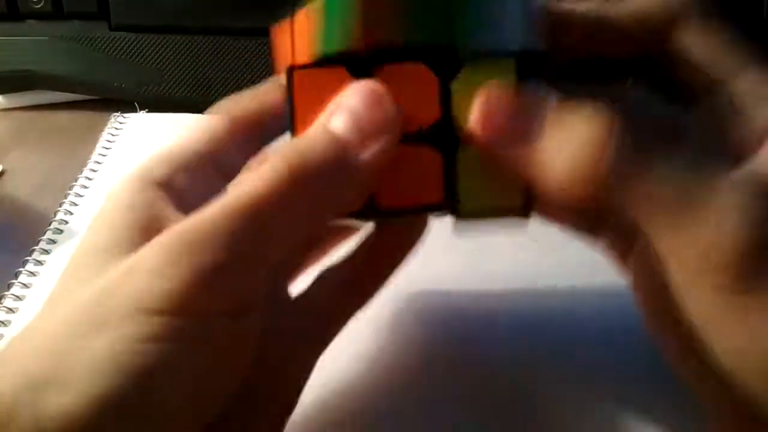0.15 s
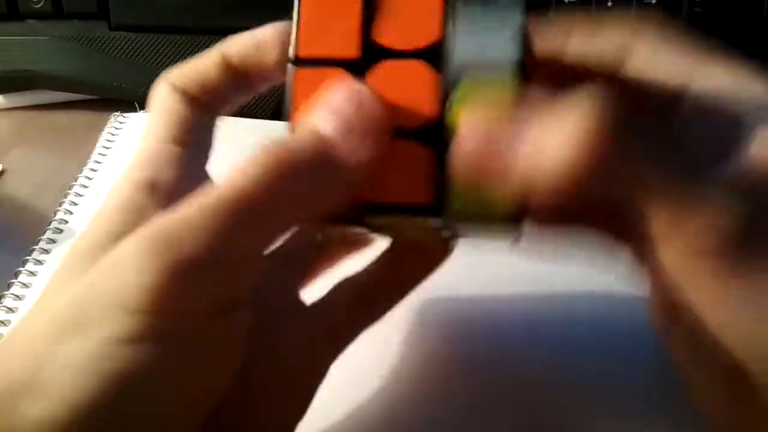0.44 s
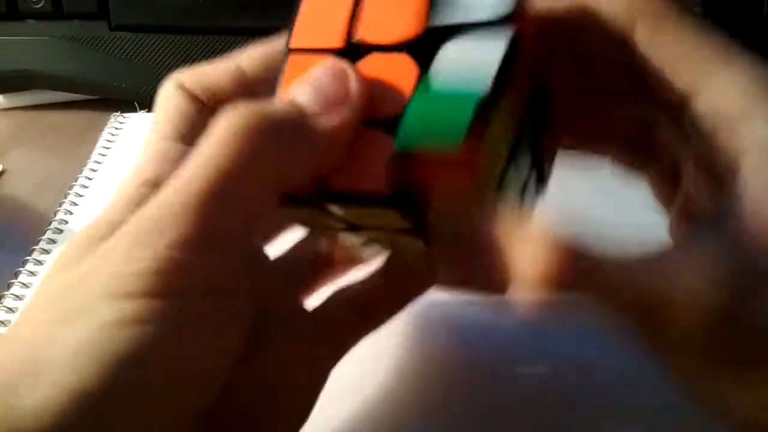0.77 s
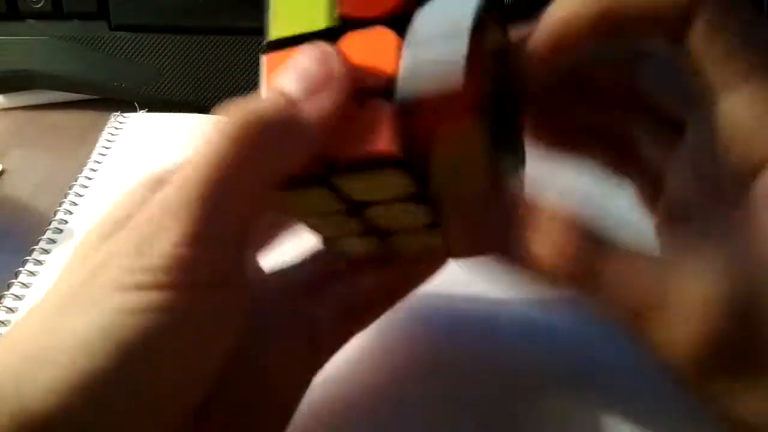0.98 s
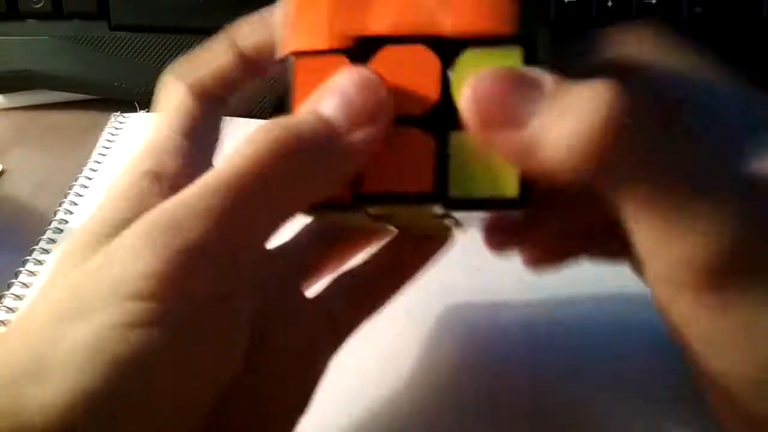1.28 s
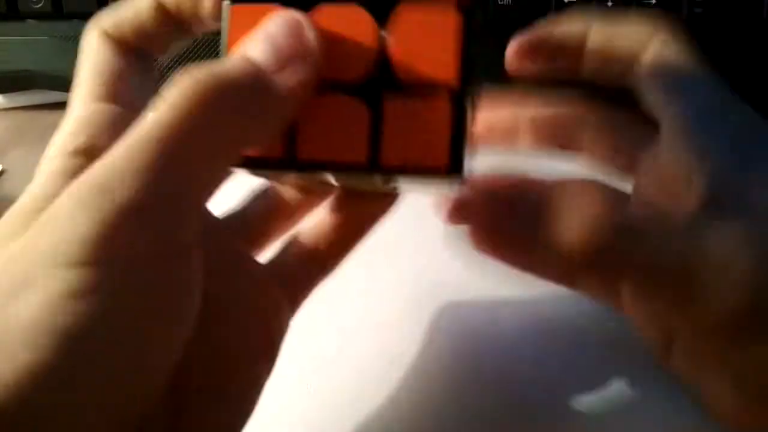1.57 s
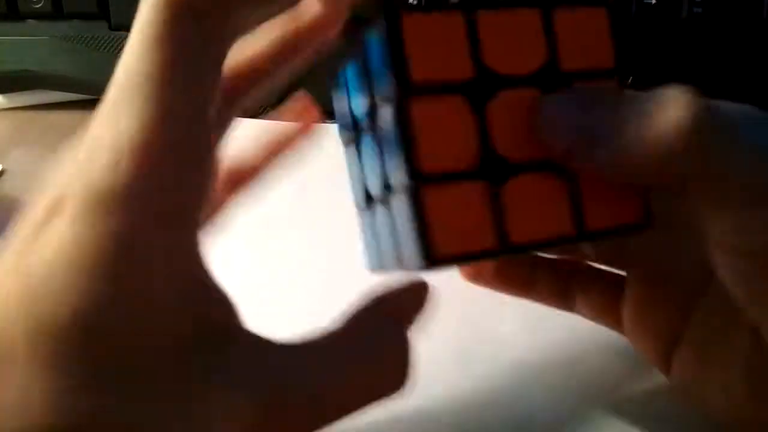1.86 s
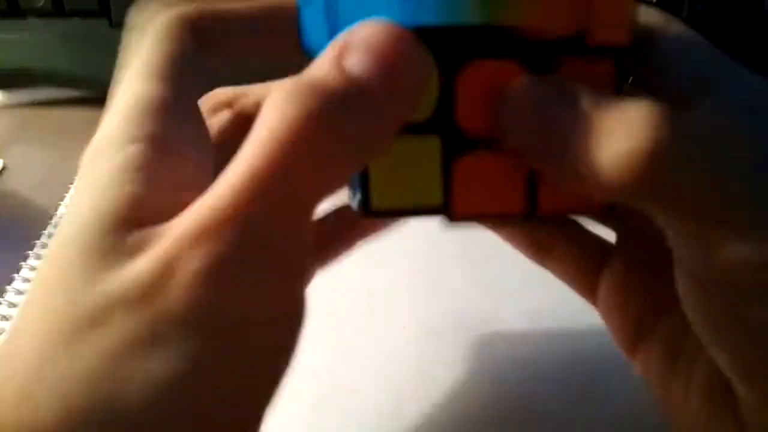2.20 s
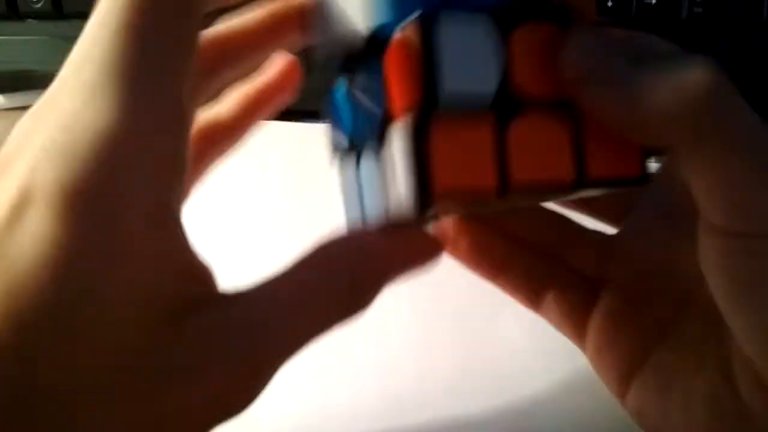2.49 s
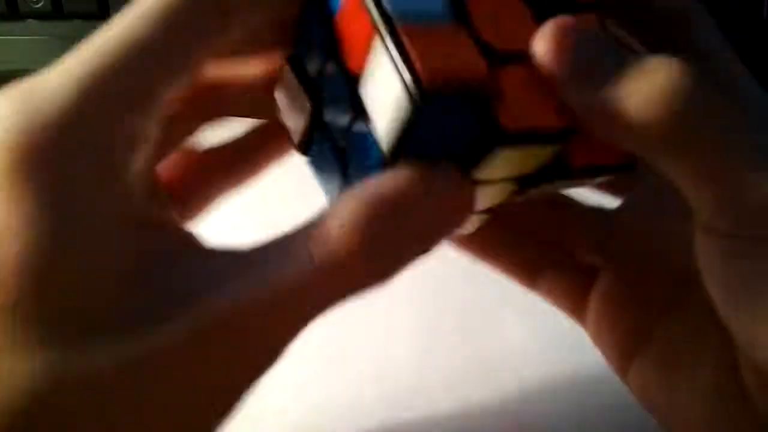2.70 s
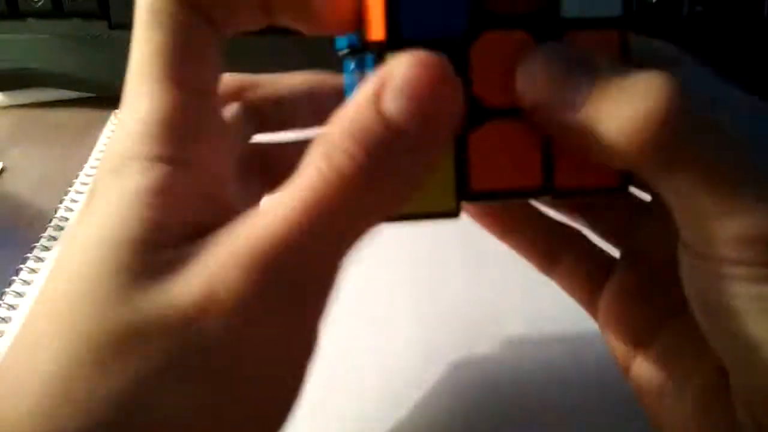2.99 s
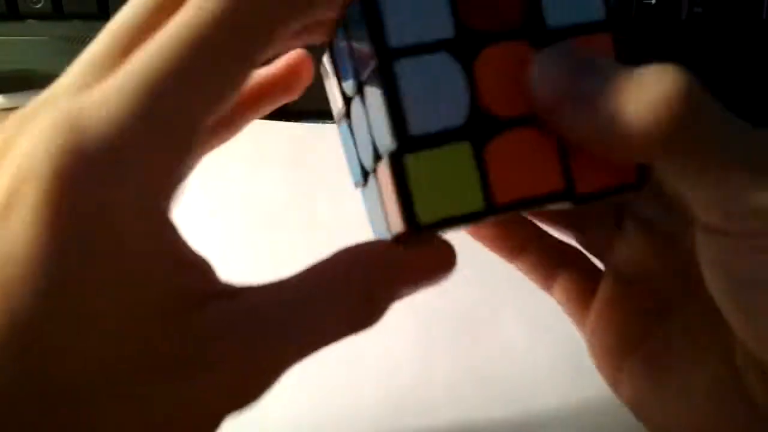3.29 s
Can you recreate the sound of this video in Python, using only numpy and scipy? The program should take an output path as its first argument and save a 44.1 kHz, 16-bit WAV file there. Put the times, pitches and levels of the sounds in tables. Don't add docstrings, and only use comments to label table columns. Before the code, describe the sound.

Rapid plastic clacks and sharp snaps of a puzzle cube, with grainy rubbing layers between turns and soft finger taps later; close stereo microphone, small indoor room, faint hiss beneath, one short lull midway.

```python
import sys
import numpy as np
from scipy import signal
from scipy.fft import rfft, irfft, next_fast_len
from scipy.io import wavfile
from scipy.ndimage import uniform_filter1d, map_coordinates

SR = 44100
rng = np.random.default_rng(int(sys.argv[2]) if len(sys.argv) > 2 else 0)


def transcribe(u):
    v = np.clip(np.atleast_2d(u).T, -1, 1)
    q = np.round(v * 32767).astype(np.int16)
    wavfile.write(sys.argv[1], SR, q)


def decibels_to_gain(level_db):
    exponent = np.asarray(level_db, float) / 20
    return 10 ** exponent


N = 152145
T = np.arange(N) / SR


def unit(x):
    return x / np.sqrt(np.mean(x ** 2) + 1e-20)


def along(points, hz):
    f, v = np.transpose(points)
    return np.interp(np.log(hz + 1), np.log(f + 1), v)


def filtered(x, response):
    m = next_fast_len(N + 8192)
    return irfft(rfft(x, m) * response(np.fft.rfftfreq(m, 1 / SR)), m)[..., :N]


def coloured(x, gain):
    power = np.mean(abs(gain(np.linspace(0, SR / 2, num=999))) ** 2)
    return filtered(x, gain) / np.sqrt(power)


def wobble(rate, size):
    knots = rng.standard_normal(int(size * rate / SR) + 4)
    return map_coordinates(knots, [np.arange(size) * rate / SR])


def pair(size):
    shared = 0.29
    a = rng.standard_normal((3, size))
    return np.sqrt(shared) * a[0] + np.sqrt(1 - shared) * a[1:]


# (f/Hz, level/dB)
EDGE_TONE = [(300, -75), (1900, -14.5), (3200, -13.5), (3900, -13.5), (5800, -5.5), (9600, -3), (13000, -8),
             (16000, -10)]


def edge(x):
    return coloured(x, lambda hz: decibels_to_gain(along(EDGE_TONE, hz)))


# (f/Hz, width/Hz, level/dB)
SHELL_MODES = [(453, 180, -1.5), (781, 113, 3), (1082, 306, 1), (2030, 60, -14), (2317, 650, -1.5)]


def body(x):
    def gain(f):
        low_cut = 1j * f / (SHELL_MODES[0][0] + 1j * f)
        ring = 0
        for k, (centre, width, db) in enumerate(SHELL_MODES):
            ring = ring + (-1) ** k * decibels_to_gain(db) * 1j * f * width / (centre * centre - f * f + 1j * f * width)
        return low_cut * ring
    return coloured(x, gain)


# (t/s, level/dB, length/ms, hollow shell level/dB)
RATTLES = [(0.0069, -21.5, 8.5, -34), (0.0751, -46, 4.4, -34), (0.111, -13, 1.9, -22.5),
           (0.116, -4.5, 7.6, -32), (0.215, -21.5, 3.7, -28.5), (0.2336, -16, 3, -26),
           (0.2438, -5.5, 7.9, -21.5), (0.2671, -16, 6.2, -22.5), (0.301, -12, 2.75, -20),
           (0.3361, -17, 2.5, -32), (0.405, -13, 5.4, -27), (0.4249, -7.5, 5, -23),
           (0.49, -13.5, 1.2, -19.5), (0.4985, -12, 4, -20), (0.518, -10, 9.9, -25.5),
           (0.5394, -10, 4.9, -24), (0.6328, -9, 3.3, -20.5), (0.6506, -7.5, 5.5, -25.5),
           (0.6583, -13, 3.6, -56), (0.685, -17, 8.7, -29.5), (0.709, -8, 4, -42),
           (0.7283, -7.5, 8.4, -31.5),
           (0.7964, -16.5, 3.5, -34), (0.8049, -10, 3.2, -27), (0.8118, -33, 6.8, -29),
                  (0.8306, -5, 4.5, -19.5), (0.8996, -10, 5.1, -20.5), (0.9278, -13, 8.7, -31),
                  (1.0267, -18.5, 3.7, -24), (1.0443, -6.5, 9.8, -27.5), (1.0767, -20, 30, -32),
                  (1.102, -16.5, 2.6, -46), (1.1073, -12, 5, -44), (1.1137, -6.5, 6.1, -52),
                  (1.179, -32, 6.2, -29), (1.1953, -13.5, 8.9, -27.5), (1.2194, -3.5, 4.1, -22),
                  (1.2905, -11, 7, -21.5), (1.3052, -8.5, 1.9, -46), (1.313, -12.5, 8.1, -25),
                  (1.4111, -9, 2.4, -19), (1.4286, -28, 9.8, -21), (1.4357, -7.5, 6.8, -26.5),
                  (1.447, -1.5, 2.5, -41), (1.4673, -8, 5.5, -24.5), (1.4775, -9.5, 3.8, -46),
                  (1.4914, -8.5, 4.2, -44),
           (1.573, -35, 2.2, -40), (1.6196, -9, 3.9, -20.5), (1.637, -4.5, 4.06, -21.5),
                 (1.949, -54, 1.9, -43.5), (2.1846, -20.5, 8.1, -33), (2.2033, -22, 1, -28),
                 (2.2107, -24.5, 1.5, -39.0), (2.232, -31, 1.2, -40), (2.2958, -24, 2.8, -28),
                 (2.3134, -4.5, 5.36, -23.5), (2.3395, -6.5, 5.8, -33), (2.4577, -22, 6.4, -33.5),
                 (2.468, -19.5, 3.7, -29), (2.5149, -18.5, 7.7, -34), (2.5247, -22, 3, -30),
                 (2.5493, -8.0, 5.5, -36), (2.557, -35, 5.2, -25.5), (2.5771, -10, 3.1, -28),
                 (2.585, -10, 7.6, -29),
           (2.6952, -25.5, 1.7, -42), (2.7311, -29, 2, -30.5), (2.76, -49, 4.6, -36),
                (2.7793, -25.5, 9.4, -43), (2.8314, -23.5, 4.3, -39), (2.8536, -8, 7.3, -29),
                (2.8799, -14.5, 8.1, -31.5), (3.0307, -11.5, 2.9, -29), (3.0383, -9.5, 3.5, -23.5),
                (3.0683, -6.5, 7, -20), (3.079, -9, 8.4, -54), (3.157, -22, 11, -30.5),
                (3.1774, -35, 7.5, -54), (3.1948, -9.5, 5.1, -27), (3.2655, -33, 8.7, -52),
                (3.3638, -48, 2.5, -52)]


def rattles():
    rise_share, ring_t60_s = 0.067, 0.011
    creep_s, creep_db = 0.0037, -21
    spiky_db, colour_db, body_apart = 2.6, 3.8, 0.1
    size, lead = 2048, 600
    bins = size // 2 + 1
    bright, hollow = np.zeros((2, N + SR)), np.zeros((2, N + SR))
    t = (np.arange(size) - lead) / SR
    for s, db, ms, body_db in RATTLES:
        rise = np.exp(t * 1000 / ms / rise_share - 1)
        creep = decibels_to_gain(creep_db) * np.exp(t / creep_s)
        ring = decibels_to_gain(-60 * np.maximum(t - 0.83 * ms / 1000, 0) / ring_t60_s)
        shape = np.minimum(rise + creep, 1) * ring
        burst = pair(size) * shape * decibels_to_gain(spiky_db * wobble(1502, size))
        burst *= np.linalg.norm(shape) / np.linalg.norm(burst, axis=1, keepdims=True)
        ripple = decibels_to_gain(colour_db * np.array([wobble(1114, bins), wobble(990.5, bins)]))
        ripple /= np.sqrt(np.mean(ripple ** 2))
        at = round(s * SR)
        bright[:, at:at + size] += decibels_to_gain(db - 0.5) * irfft(rfft(burst) * ripple)
        push = burst.mean(axis=0) + body_apart * (burst - burst[::-1])
        hollow[:, at:at + size] += decibels_to_gain(body_db) * push * shape
    return edge(bright[:, lead:N + lead]) + body(hollow[:, lead:N + lead])


# (t/s, level/dB, brightest f/Hz)
SNAPS = [(0.1126, -14, 9800), (0.1288, -12, 9400), (0.1637, -21.5, 7900), (0.2226, -17.5, 9900),
         (0.2333, -24, 11200), (0.2923, -18.5, 7800), (0.327, -25, 8900), (0.3488, -24, 8900),
         (0.4058, -15.5, 9800), (0.4158, -27, 8700), (0.4222, -21, 9300), (0.501, -21, 7200),
         (0.532, -17, 10200), (0.6154, -31, 7300), (0.7197, -32, 9100), (0.7491, -17.5, 7740),
         (0.812, -14.4, 10200), (1.0132, -30, 9500), (1.024, -21.6, 9000), (1.0273, -13, 11100),
         (1.0407, -18, 8900), (1.0802, -8, 9900), (1.1082, -11.8, 10100), (1.1246, -19, 8900),
         (1.2073, -22, 9700), (1.284, -24, 8200), (1.3166, -11, 7600), (1.412, -15.5, 10100),
         (1.429, -21, 10500), (1.4535, -19, 10300), (1.4607, -16, 8700), (1.6758, -22.0, 6760),
         (1.9195, -37, 10500), (2.203, -13.5, 10100), (2.214, -13, 10800), (2.2318, -23, 10100),
         (2.336, -3.5, 7700), (2.442, -29, 9900), (2.497, -35, 7700), (2.5127, -22.9, 9400),
         (2.5457, -10, 9300), (2.5583, -8.5, 9400), (2.597, -9, 9200), (2.6266, -25.2, 9800),
         (2.6503, -25, 9600), (2.6605, -34, 8900), (2.689, -24.5, 12600), (2.816, -29.3, 8600),
         (2.8453, -27, 9600), (2.855, -9, 11500), (2.8641, -14, 10400), (2.8756, -13, 9000),
         (3.0101, -36, 11300), (3.043, -15, 9100), (3.0585, -15.5, 12300), (3.1451, -32, 7500),
         (3.1676, -20.5, 7800), (3.17, -22, 9100), (3.1833, -25.7, 9700), (3.3633, -35.5, 12200)]


def ticks():
    hold_s, t60_s, wide, body_db = 0.00071, 0.0078, 0.44, -8
    out, size = np.zeros((2, N + SR)), 512
    t, f = np.arange(size) / SR, np.fft.rfftfreq(size, 1 / SR)
    shape = decibels_to_gain(-60 * np.maximum(t - hold_s, 0) / t60_s)
    for s, db, hz in SNAPS:
        resonance = 1j * f / (hz * hz - f * f + 1j * f * hz * wide)
        snap = irfft(rfft(pair(size) * shape) * resonance)
        snap *= np.linalg.norm(shape) / np.linalg.norm(snap, axis=1, keepdims=True)
        at = round(s * SR)
        out[:, at:at + size] += decibels_to_gain(db) * snap
    out = out[:, :N]
    return edge(out) + decibels_to_gain(body_db) * body(out.mean(axis=0))


def patchy(x):
    patch_db = 3
    z = signal.stft(x, nperseg=256)[2]
    field = uniform_filter1d(rng.standard_normal(z.shape[1:]), size=7, axis=0)
    field = uniform_filter1d(field, size=9, axis=1)
    return unit(signal.istft(z * decibels_to_gain(patch_db * unit(field)), nperseg=256)[1][:, :N])


# (start t/s, end t/s, level/dB)
STROKES = [(-.05, 0.029, -20), (0.059, 0.23, -28), (0.253, 0.363, -30), (0.379, 0.437, -28.5),
           (0.49, 0.58, -34), (0.608, 0.785, -24.5), (0.837, 0.999, -27.5), (1.033, 1.113, -19.5),
           (1.157, 1.325, -27.5), (1.391, 1.425, -28), (1.417, 1.502, -21.5), (1.591, 1.691, -28),
           (1.771, 1.896, -51.5), (1.897, 1.935, -50.5), (2.137, 2.3, -31), (2.346, 2.547, -33.5),
           (2.602, 2.712, -40), (2.721, 2.84, -37), (2.841, 2.9, -25.5), (3.01, 3.096, -25.5),
           (3.134, 3.293, -40.5), (3.437, 3.483, -37.5)]


def slides():
    rise_share, body_db = 0.26, -11.5
    rough_db, tick_db = 1.5, 1.5
    stroke = np.zeros(N)
    for a, b, db in STROKES:
        rise = rise_share * (b - a)
        stroke += decibels_to_gain(db) * np.interp(T, [a, a + rise, b - rise, b], [0, 1, 1, 0])
    ticks_db = tick_db * np.maximum(wobble(350, N), 0) ** 2
    grain = unit(decibels_to_gain(rough_db * wobble(70, N) + np.minimum(ticks_db, 9)))
    rub = stroke * grain * patchy(pair(N))
    return edge(rub) + decibels_to_gain(body_db) * body(rub.mean(axis=0))


# (t/s, peak level/dB, extra weight of the low modes/dB)
FINGERS = [
    (0.819, -35, 4),
    (2.287, -20, -2),
    (2.47, -35, 4),
    (2.536, -19, -8),
    (2.908, -23.5, -4.5),
    (3.179, -26, -9),
    (3.24, -24.5, -9),
]
# (f/Hz, level/dB, t60/s)
THUD_MODES = [(110, -5, .04), (200, 0, .04), (330, -8, .03), (490, -4, .045)]


def taps():
    onset_s = .004
    out = np.zeros(N)
    for s, db, low_db in FINGERS:
        t = np.maximum(T - s, 0)
        thud = np.zeros(N)
        for hz, level, t60 in THUD_MODES:
            decay = decibels_to_gain(level + low_db * (hz < 400) - 60 * t / t60)
            pitch = hz * rng.normal(1, 0.052)
            thud += decay * np.sin(2 * np.pi * pitch * t)
        out += decibels_to_gain(db) * (1 - np.exp(-t / onset_s)) * thud
    return filtered(out, lambda hz: (1j * hz / (THUD_MODES[0][0] + 1j * hz)) ** 2)


# (f/Hz, t60/s)
ROOM_DECAY = [(300, 0.29), (2000, 0.25), (14000, 0.15)]


def room(x):
    delay = round(.004 * SR)
    out, step = np.zeros((2, N + SR)), SR // 4
    for at in range(0, N, step):
        hz, t, z = signal.stft(rng.standard_normal((2, SR // 2)), SR, nperseg=256)
        decay = decibels_to_gain(-60 * t / along(ROOM_DECAY, hz)[:, None])
        tail = signal.istft(z * decay, SR, nperseg=256)[1]
        wet = signal.fftconvolve(x[:, at:at + step], tail / np.linalg.norm(tail[0]), axes=1)
        out[:, at + delay:][:, :wet.shape[1]] += wet
    return out[:, :N]


# (f/Hz, level per Hz/dB)
HISS_TONE = [(30, -1), (80, -12), (200, -3.5), (450, -15), (1500, -23.5), (4000, -25), (7000, -24),
             (14000, -12), (16000, -34)]
# (f/Hz, correlation)
HISS_LIKENESS = [(60, 0.54), (300, 0.62), (1000, 0)]


def floor():
    hiss_db, whine_hz, whine_db = -50, 14002, -64
    boom_s, boom_wide_s, boom_hz, boom_db = 2.125, 0.062, 54.7, -42

    def mid_side(hz):
        turn = np.arccos(np.clip(along(HISS_LIKENESS, hz), -1, 1)) / 2
        return decibels_to_gain(along(HISS_TONE, hz)) * [np.cos(turn), np.sin(turn)]

    noise = rng.standard_normal((2, N)) * decibels_to_gain(1.2 * wobble(90, N))
    mid, side = filtered(noise, mid_side)
    hiss = decibels_to_gain(hiss_db) * unit(np.array([mid + side, mid - side]))
    whine_level = decibels_to_gain(whine_db + 4 * np.minimum(wobble(8, N), 1))
    whine = whine_level * np.sin(2 * np.pi * whine_hz * T)
    swell = np.exp(-.5 * ((T - boom_s) / boom_wide_s) ** 2)
    boom = decibels_to_gain(boom_db) * swell * np.sin(2 * np.pi * boom_hz * T)
    return hiss + whine + boom


# (f/Hz, level/dB)
PORT_LEAN = [(300, -2.5), (1300, 1), (9000, -5), (15000, -5.5)]
# (f/Hz, phase/rad)
PORT_PHASE = [(0, 0), (1000, .5), (2000, 3.1), (8200, 22), (16000, 30.1)]


def scene():
    room_db = -8.5
    cube = rattles() + ticks() + slides() + taps()
    side = np.array([[.5], [-.5]])

    def ports(hz):
        phase = np.interp(hz, *np.transpose(PORT_PHASE))
        return decibels_to_gain(side * along(PORT_LEAN, hz)) * np.exp(-1j * side * phase)

    return filtered(cube + decibels_to_gain(room_db) * room(cube), ports) + floor()


def low_pass(x):
    return signal.sosfilt(signal.butter(12, 16880, fs=SR, output="sos"), x)


def record(dry):
    ceiling, knee = 0.73, 7
    squeezed = dry / (1 + np.abs(dry / ceiling) ** knee) ** (1 / knee)
    mix = filtered(squeezed, lambda hz: hz < 15900)
    return low_pass(mix)


dry = scene()
out = record(dry)
transcribe(out)
```